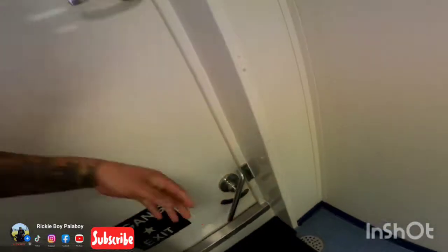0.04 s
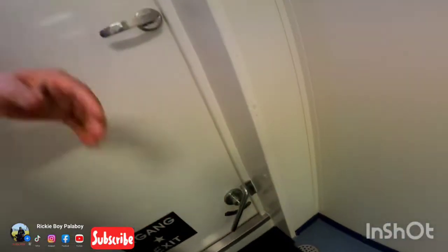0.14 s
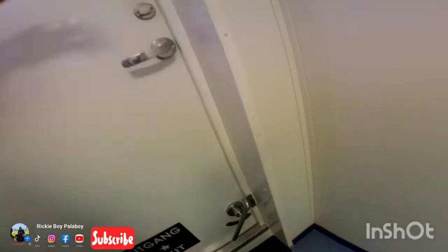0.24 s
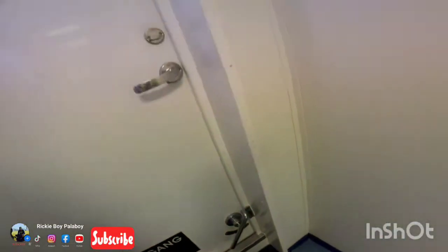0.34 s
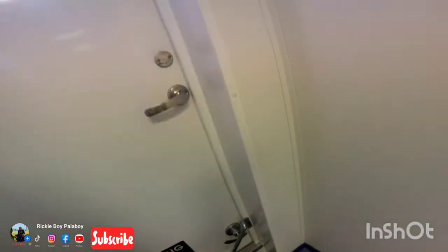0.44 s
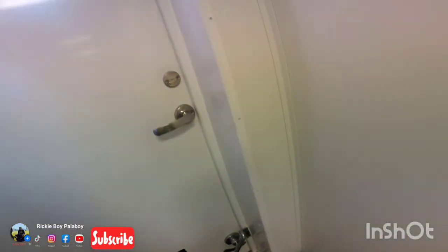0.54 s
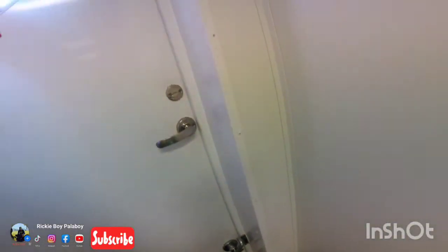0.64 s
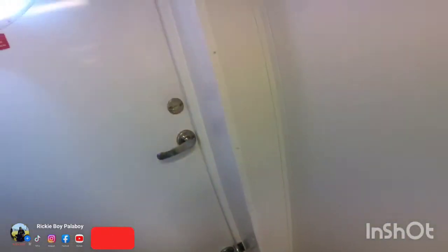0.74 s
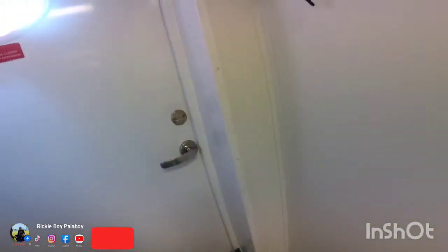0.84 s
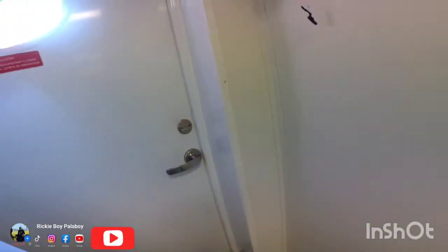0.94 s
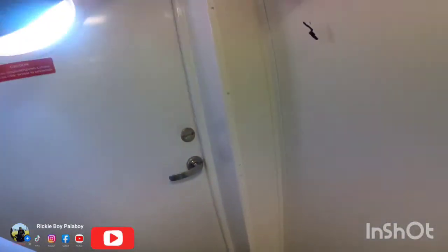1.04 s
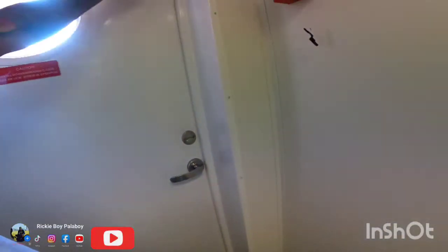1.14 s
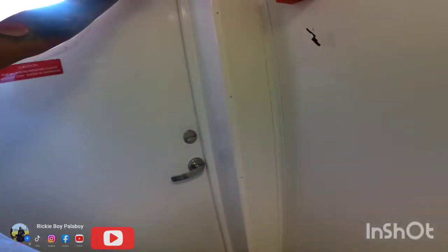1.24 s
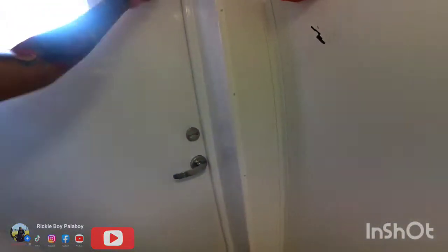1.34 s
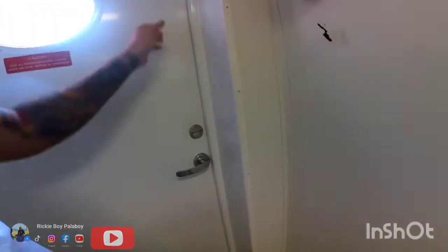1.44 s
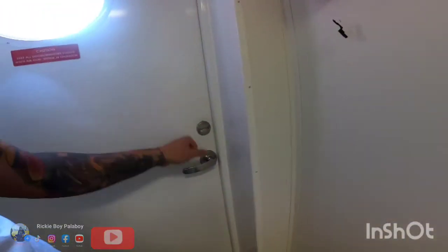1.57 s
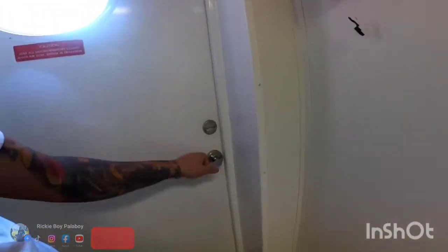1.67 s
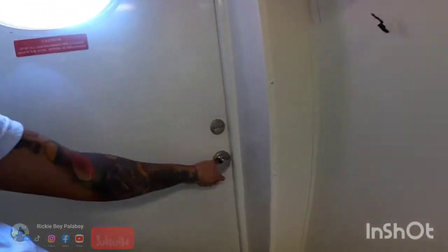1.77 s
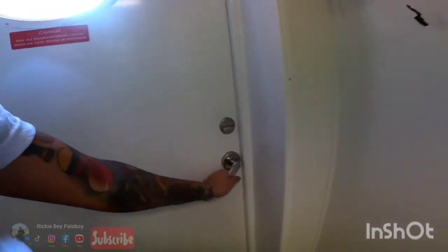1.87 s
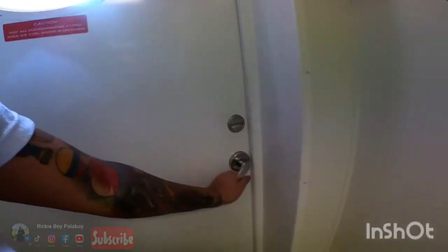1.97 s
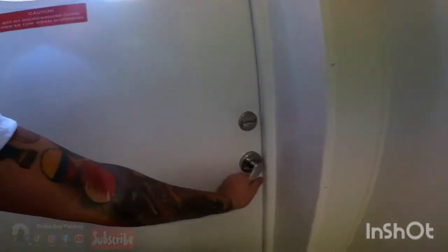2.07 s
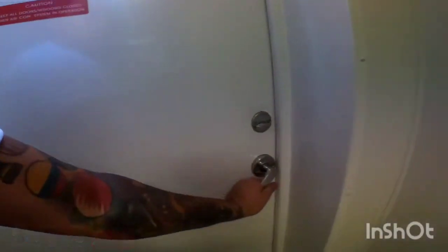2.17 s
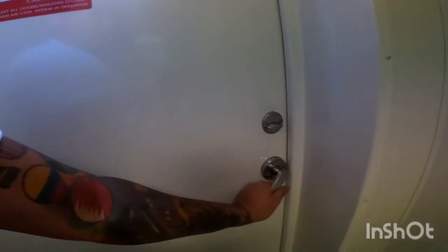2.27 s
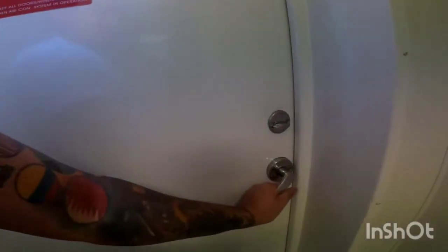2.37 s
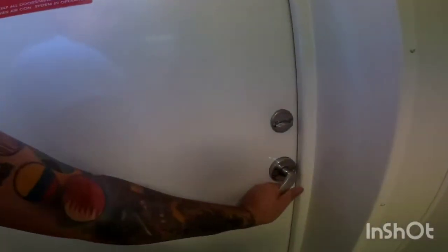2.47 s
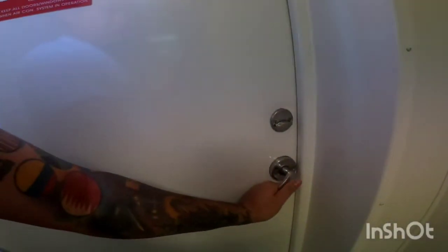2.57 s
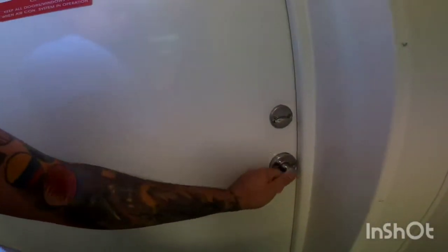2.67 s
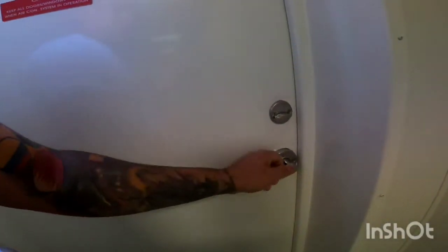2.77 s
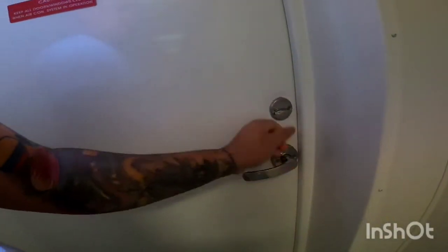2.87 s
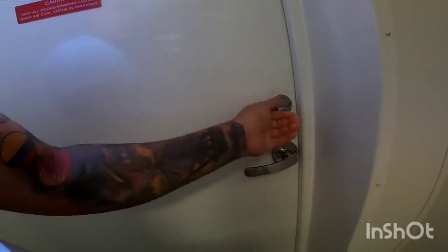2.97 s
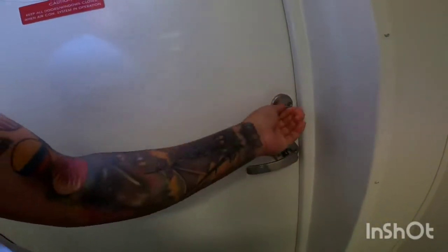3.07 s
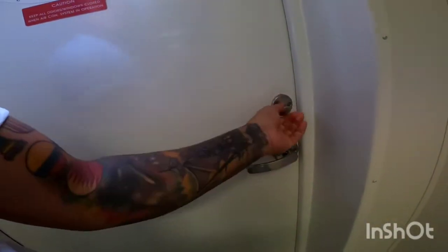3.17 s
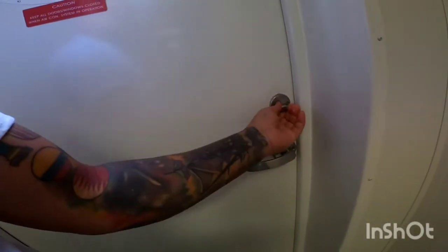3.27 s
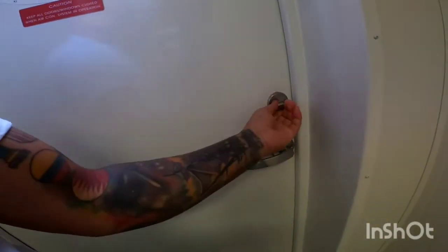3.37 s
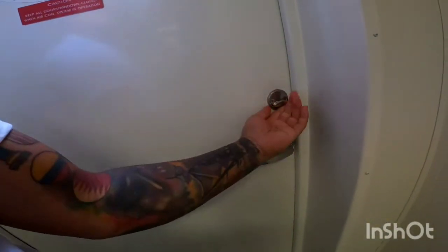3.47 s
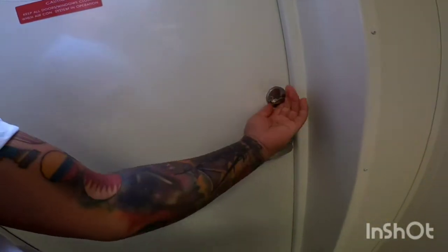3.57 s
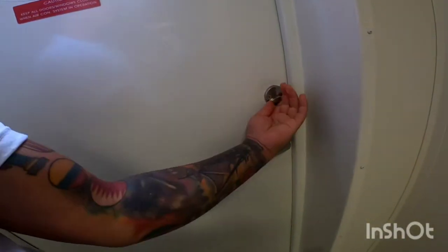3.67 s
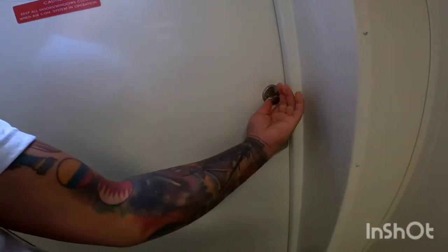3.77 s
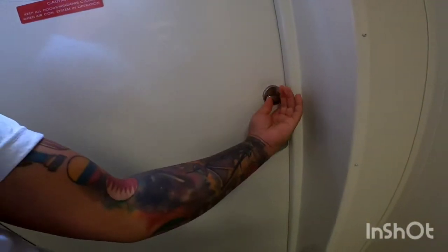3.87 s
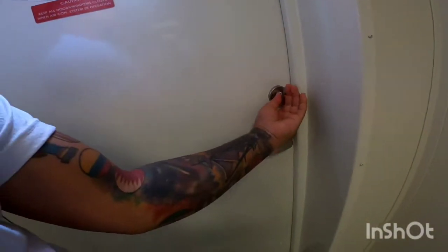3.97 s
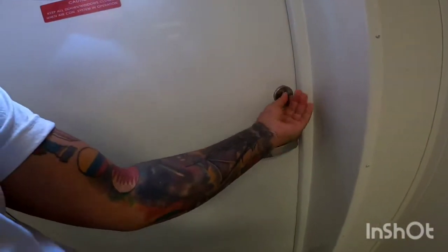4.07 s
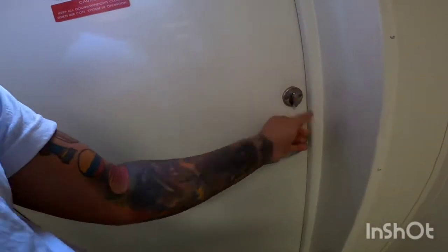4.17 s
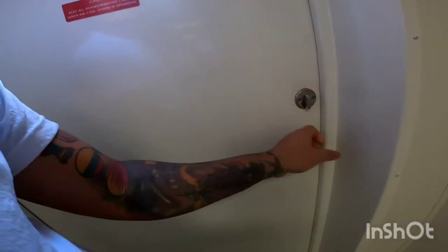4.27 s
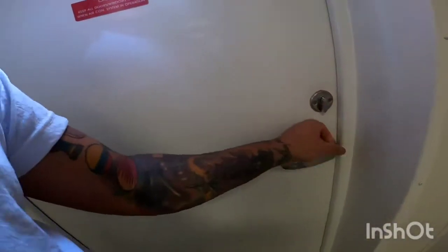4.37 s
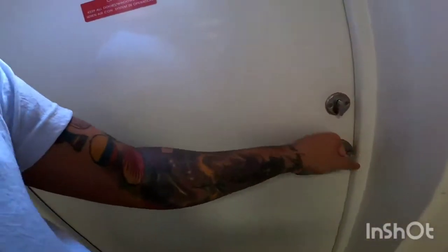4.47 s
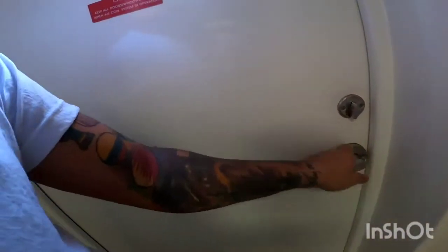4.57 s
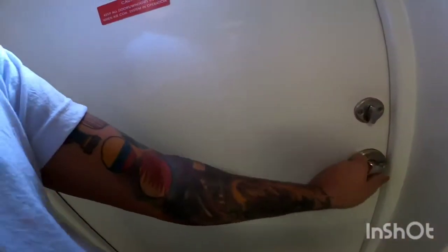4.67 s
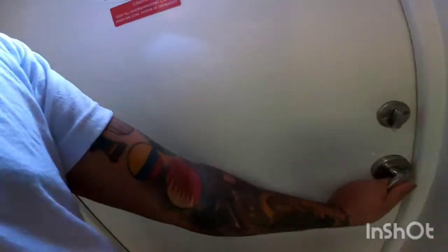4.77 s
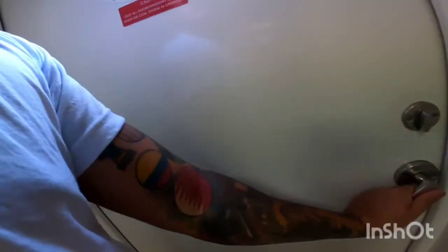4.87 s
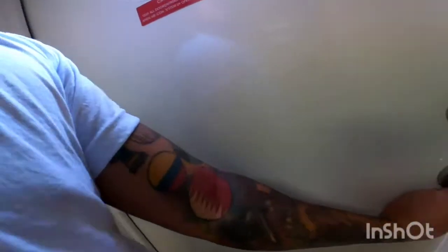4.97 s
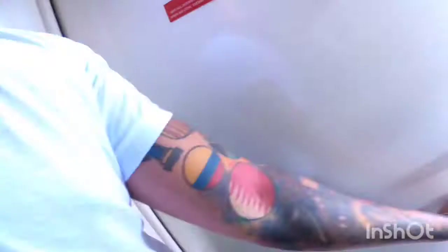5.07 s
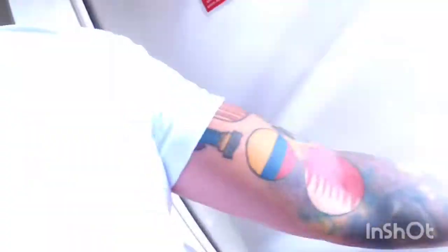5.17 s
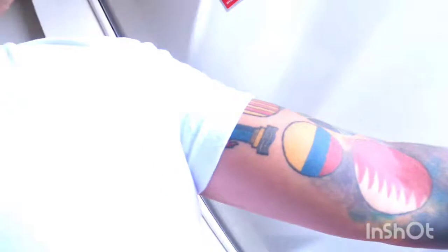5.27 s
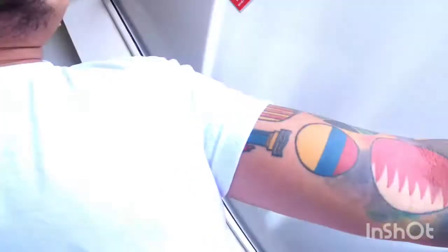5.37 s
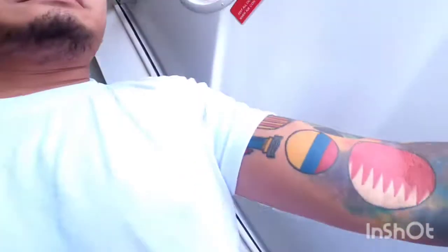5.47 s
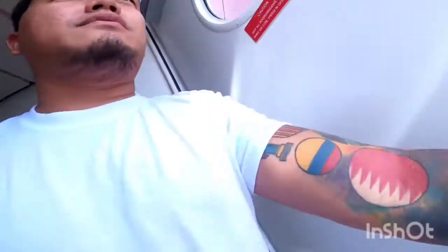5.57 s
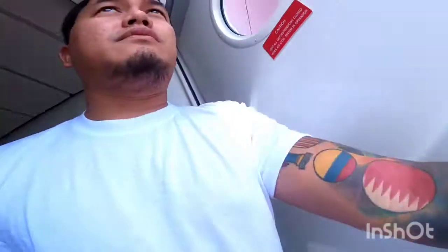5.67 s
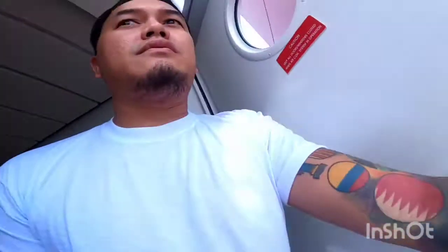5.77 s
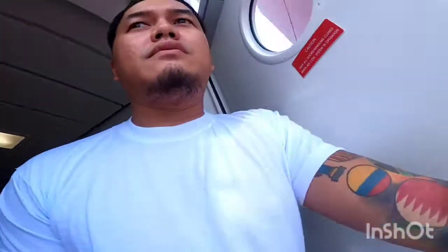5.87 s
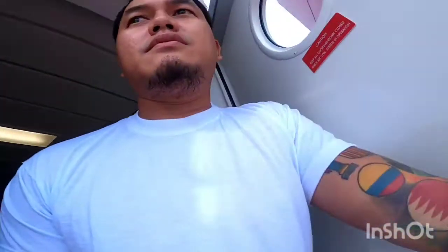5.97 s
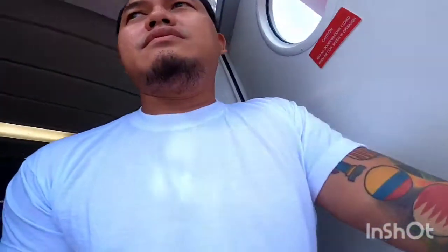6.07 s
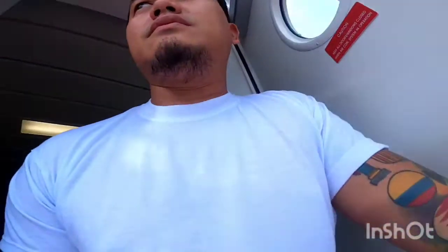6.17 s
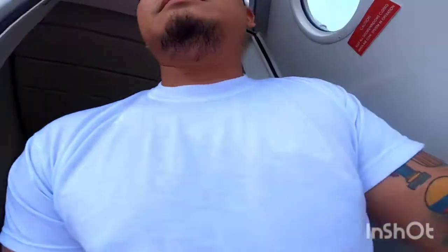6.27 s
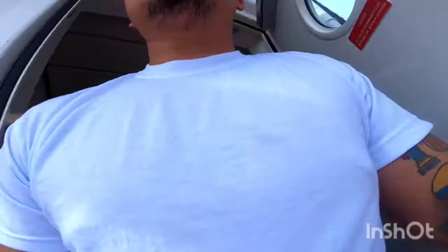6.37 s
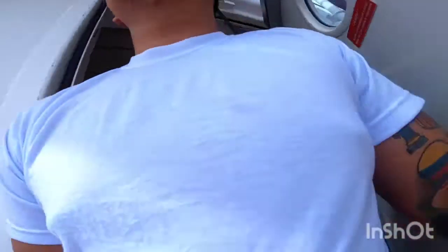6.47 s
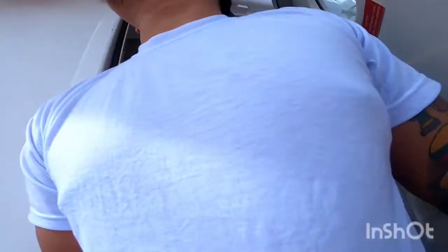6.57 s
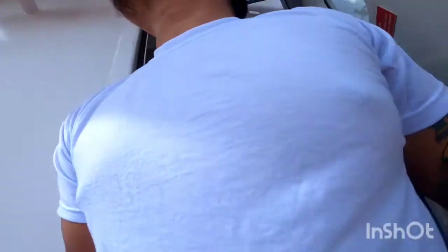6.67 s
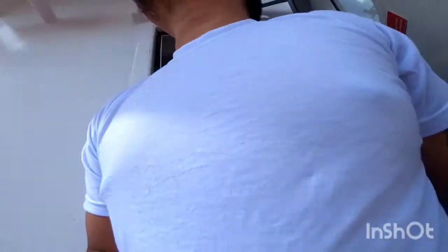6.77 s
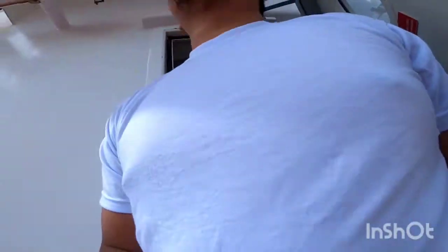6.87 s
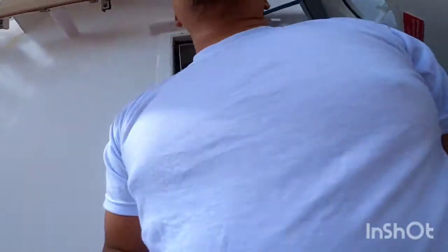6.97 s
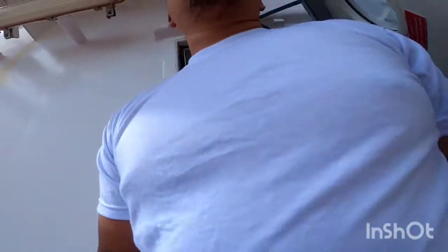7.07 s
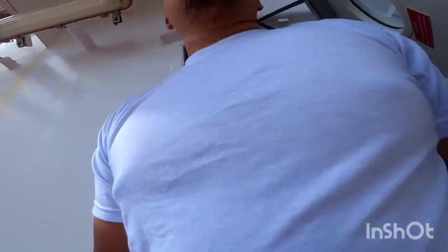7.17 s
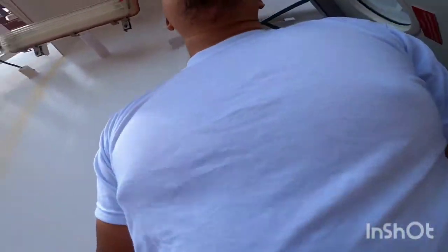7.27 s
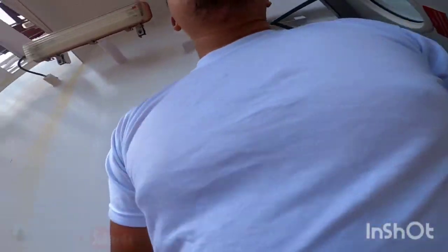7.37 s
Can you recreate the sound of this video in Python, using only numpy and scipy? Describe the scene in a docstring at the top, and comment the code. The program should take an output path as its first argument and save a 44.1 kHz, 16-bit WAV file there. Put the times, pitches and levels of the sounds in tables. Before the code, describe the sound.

Deep uneven hull throb and soft vent air; heavy steel door latches clack and echo, then the door opens onto a loud fan roar.

```python
"""First the deep throb of a hull and soft vent air, heard in a small steel ship's lobby; then tiny metal pings.
Close to the microphone a hand works the dogs, handle and lock of a weather door: noise cracks leave steel modes ringing.
The bolt snaps back, the leaf drags out of its seal and the panel booms in bending modes; bare walls echo the hardware.
Shirt rustle is faint indoors and returns on deck, where the filtered-noise roar and fluttering tones of the fans
stand amid wind."""
import sys
import numpy as np
from scipy import signal
from scipy.fft import rfft, irfft
from scipy.io import wavfile

SR = 44100
rng = np.random.default_rng(int(sys.argv[2]) if len(sys.argv) > 2 else 0)


def put_to_file(sound):
    """Save the sound as 16-bit audio at rate SR, in the file named by the first command-line argument."""
    columns = np.atleast_2d(sound).T  # one column per channel
    safe = np.clip(columns, -1, 1)
    whole_steps = np.round(safe * 32767)
    wavfile.write(sys.argv[1], SR, whole_steps.astype(np.int16))


N = 328104
TIME, BINS = np.arange(N) / SR, np.fft.rfftfreq(N, 1 / SR)


def amp(db):
    """Decibels to gain."""
    return 10 ** (np.asarray(db) / 20)


def unit(x):
    """Scales to rms 1."""
    return x / np.sqrt(np.mean(abs(x) ** 2) + 1e-30)


def over_hz(table, hz, axis=1):
    """Reads a column of a table along log frequency."""
    columns = np.transpose(table)
    return np.interp(np.log(hz + 1), np.log(columns[0] + 1), columns[axis])


def over_time(table, axis=1):
    """Reads a column of a table at every sample."""
    columns = np.transpose(table)
    return np.interp(TIME, columns[0], columns[axis])


def add(mix, s, sound):
    """Mixes a sound in at time s."""
    part = mix[:, round(s * SR):][:, :sound.shape[-1]]
    part += sound[..., :part.shape[1]]


def wander(rate_hz):
    """Slow complex random motion of rms 1."""
    spin = np.fft.fftfreq(N, 1 / SR)
    noise = rng.standard_normal(N) + 1j * rng.standard_normal(N)
    return unit(np.fft.ifft(noise * np.exp(-(spin / rate_hz) ** 2)))


def humps(table, hz):
    """Gain in dB of a set of broad resonances and dips."""
    return sum(db / (1 + (2 * (hz - f) / width) ** 4) for f, width, db in table)


def resonance(x, hz, width):
    """A resonance of gain 1 that follows a fixed or moving frequency."""
    turn = np.exp(2j * np.pi * np.cumsum(hz * np.ones(x.shape[-1])) / SR)
    r = np.exp(-np.pi * width / SR)
    # shift the resonance down to 0 Hz, smooth there, and shift back up
    return 2 * (turn * signal.lfilter([1 - r], [1, -r], x / turn)).real


def registers(x, edges_hz):
    """Splits a sound into bands at the given edges."""
    passes = [(edges_hz[0], "low")]
    passes += [(pair, "band") for pair in zip(edges_hz, edges_hz[1:])]
    passes += [(edges_hz[-1], "high")]
    return [signal.sosfilt(signal.butter(5, hz, kind, fs=SR, output="sos"), x) for hz, kind in passes]


def ringing(modes, t):
    """The dying modes of a struck part."""
    return sum(amp(db - 60 * t / t60) * np.sin(2 * np.pi * (hz * t + rng.random())) for hz, db, t60 in modes)


def rattling(modes, t, blur_hz):
    """The dying modes of a loose part, each blurred by its chatter."""
    chatter = rng.standard_normal((2, len(t)))
    out = 0
    for hz, db, t60 in modes:
        blurred = resonance(resonance(chatter, hz, blur_hz), hz, blur_hz)
        out = out + amp(db - 60 * t / t60) * unit(blurred)
    return out


# likeness of the two microphone ports: (frequency [Hz], coherence [0-1])
PORT_LIKENESS = [(40, 1), (90, 1), (180, 1), (320, 0.99), (520, 0.95), (900, 0.82), (1500, 0.8),
                 (2600, 0.51), (4500, 0.25), (8000, 0.18)]
# lead of the left port: (frequency [Hz], phase [radians])
PORT_LEAD = [(280, 0), (1000, -0.13), (1900, 0.087), (4000, -0.91), (8000, -1.7)]


def air_noise(colour, size=N):
    """Coloured noise at the two ports: alike in the bass, apart in the treble."""
    hz = np.fft.rfftfreq(size, 1 / SR)
    left, other = rfft(rng.standard_normal((2, size)))
    same = np.clip(over_hz(PORT_LIKENESS, hz), 0, 1)
    right = same * left + np.sqrt(1 - same ** 2) * other
    right = right * np.exp(-1j * over_hz(PORT_LEAD, hz))
    return unit(irfft(np.array([left, right]) * amp(colour(hz)), size))


# uneven level of the hull's beating tone: (time [s], level before trim [dB])
THROB = [(0, -33.5), (.08, -22.5), (.17, -36), (0.45, -30.5), (.75, -25.5), (.85, -30), (0.95, -23),
         (1.27, -29.5), (1.38, -40), (1.73, -22.5), (2.18, -23), (2.45, -46), (3.0, -31), (3.12, -41),
         (3.32, -21.5), (3.41, -35), (3.5, -29), (3.84, -34.5), (4.03, -25), (4.16, -22.5), (4.21, -39),
         (4.3, -27), (4.43, -21), (4.55, -49), (4.68, -23.5), (4.8, -29), (5.0, -27.5), (5.6, -27.5),
         (6.3, -33.5), (7.4, -43.5)]
THROB_HZ, THROB_TRIM_DB = 43.8, -2.5
SHUDDER_DB, SHUDDER_HZ = -39, 11.2  # random shaking that beats with the tone


def hull(overtone_db=-20):
    """The engine shakes the hull in one deep tone with a weak octave; random shuddering makes it beat."""
    pitch_hz = THROB_HZ + .35 * wander(2.14).real  # slight drift
    turn = np.exp(2j * np.pi * np.cumsum(pitch_hz) / SR)
    tone = amp(over_time(THROB) + THROB_TRIM_DB) * (turn + amp(overtone_db) * turn ** 2)
    shudder = amp(SHUDDER_DB) * wander(SHUDDER_HZ) * turn
    return np.sqrt(2) * (tone + shudder).real


# colour of the lobby's vent air: (frequency [Hz], density [dB per Hz])
VENT_COLOUR = [(20, -4), (85, -2), (120, -13.5), (160, -11.5), (225, -16), (300, -17.5), (450, -20.5),
               (650, -27.5), (1600, -34.5), (2400, -46.5), (3500, -53), (5000, -60.5), (7500, -62),
               (10000, -75), (15000, -87.5)]
VENT_DB = -37.5


def vent():
    """Soft, dull, nearly steady air of the lobby's ventilation."""
    swell_db = .6 * wander(3).real
    return amp(VENT_DB + swell_db) * air_noise(lambda hz: over_hz(VENT_COLOUR, hz))


# where the microphone is: (time [s], place [0 lobby, 1 doorway, 2 deck])
PLACE = [(4.8, 0), (4.98, .5), (5.16, 1), (5.6, 1.1), (6.1, 1.8), (6.7, 2)]
# gusts on the microphone: (lobby [dB], doorway [dB], deck [dB])
WIND_DB = (-80, -58, -36.5)


def wind(corner_hz=55, lump_db=3):
    """Eddies buffet each port on its own, more the farther out the microphone is."""
    band = signal.butter(2, [corner_hz / 3, corner_hz * 2], "band", fs=SR, output="sos")
    eddies = signal.sosfilt(band, rng.standard_normal((2, N)))
    level_db = np.interp(over_time(PLACE), np.arange(3), WIND_DB)
    return unit(eddies) * amp(level_db + lump_db * wander(6).real)


# blade tones of the fans: (frequency [Hz], lobby [dB], doorway [dB], deck [dB], flutter outside [0-1])
FAN_TONES = [(71.2, -52.5, -38, -45, .45), (149.5, -51, -39.5, -38.5, .55),
             (197.1, -52.5, -28.5, -26.8, .22), (394.2, -58, -30.5, -41, .17), (458, -65.5, -41, -36, .55),
             (591.3, -66, -51, -45.5, .25), (788.4, -78, -42, -56, .15), (898, -80, -52, -51, .4)]


def fan_tones(flutter_hz=6):
    """Blade tones hold their pitch, flutter in the turbulent inflow, and arrive fainter and more blurred indoors."""
    place, out = over_time(PLACE), np.zeros(N)
    lobby_flutter = .17  # added indoors
    for hz, *levels_db, outside_flutter in FAN_TONES:
        flutter = outside_flutter + lobby_flutter * np.maximum(1 - place, 0)
        strength = (1 - flutter + flutter * wander(flutter_hz)) / np.hypot(1 - flutter, flutter)
        tone = (strength * np.exp(2j * np.pi * hz * TIME)).real
        out += amp(np.interp(place, np.arange(3), levels_db)) * tone
    return np.sqrt(2) * out


def passing(start, end, blur_s=0.027):
    """Rises from 0 to 1 and falls back while the microphone passes a spot."""
    return (np.tanh((TIME - start) / blur_s) - np.tanh((TIME - end) / blur_s)) / 2


# colour of the deck fans: (frequency [Hz], density [dB per Hz])
ROAR_COLOUR = [(20, -11), (70, 3), (110, 1), (280, 2.5), (460, 0), (580, -9.5), (900, -12), (1200, -16),
               (2700, -27), (4500, -39.5), (6000, -50.5), (7800, -53), (9500, -65), (15000, -77)]
# resonances and dips of the fan ducts: (frequency [Hz], width [Hz], lift [dB])
DUCT = [(76, 66, -3), (143, 27, 2), (169, 16, -4), (216.6, 25, -4.5), (282, 53, 1.5), (316, 30, 3),
        (362, 64, -3.5), (437, 58, 4.5), (493.6, 24, 6), (523, 45, -5), (970, 83, 1.5)]
# rumble, rush, bright edge and hiss of the fans:
# (deck level [dB], swell as the door opens [s], extra in the frame [dB], extra beside the leaf [dB])
ROAR_BANDS = [(-24.5, 0.38, -1, -1.6), (-33, 0.34, -0.5, -2.5), (-41.5, 0.28, -.5, 1),
              (-41, 0.21, -3.5, -1.15)]
# the microphone passes frame, then leaf: (from [s], to [s])
IN_FRAME, BESIDE_LEAF = (4.6, 5.48), (5.65, 6.47)
OPENS_S, SWELL_POWER = 4.823, 1.38  # the seal parts; short waves get through the gap first


def deck_roar(gust_db=1.05):
    """Turbulent fan air; each register swells as the door opens, and frame and leaf colour it in passing."""
    def colour(hz):
        return over_hz(ROAR_COLOUR, hz) + humps(DUCT, hz)
    out = np.zeros((2, N))
    for k, (deck_db, swell_s, frame_db, leaf_db) in enumerate(ROAR_BANDS):
        band = registers(air_noise(colour), (520, 1050, 1800))[k]
        gap = np.clip((TIME - OPENS_S) / swell_s, 0, 1) ** SWELL_POWER
        level_db = deck_db + frame_db * passing(*IN_FRAME) + leaf_db * passing(*BESIDE_LEAF)
        out += unit(band) * gap * amp(level_db + gust_db * wander(11.0).real)
    return out


# air gaps that ring as the microphone passes:
# (from [s], to [s], first frequency [Hz], last frequency [Hz], width [Hz], lift [dB])
NOOKS = [(5.1, 5.5, 735, 820, 260, 6.5), (5.1, 5.5, 405, 420, 110, 2), (5.55, 6.3, 1220, 1260, 260, 4),
         (6.0, 6.7, 1210, 1530, 324, 4.5), (6.4, 7.313, 590, 550, 129, 4)]


def walk_through(x):
    """Gaps between leaf, body and bulkhead ring in passing; each resonance swells, glides and fades."""
    for start, end, from_hz, to_hz, width, db in NOOKS:
        along = np.clip((TIME - start) / (end - start), 0, 1)
        lift = amp(db * np.sin(np.pi * along)) - 1
        x = x + lift * resonance(x, from_hz + (to_hz - from_hz) * along, width)
    return x


# shading of the right port by the body on deck: (frequency [Hz], left-right difference [dB])
BODY_SHADE = [(100, 0), (300, 1.6), (700, 5), (1800, 6), (8000, 4)]


def turn_on_deck(x, start=5.36, end=6.7, levelling=0.36):
    """Turning outside shades the right port and undoes part of the phase lead between the ports."""
    lean_db = over_hz(BODY_SHADE, BINS) / 2
    left = amp(lean_db)
    right = amp(-lean_db) * np.exp(1j * levelling * over_hz(PORT_LEAD, BINS))
    turned = irfft(rfft(x) * np.array([left, right]), N)
    return x + np.interp(TIME, [start, end], [.15, 1]) * (turned - x)


# colour of sliding cloth: (frequency [Hz], density [dB per Hz])
CLOTH = [(300, -2.5), (800, -1.5), (1500, 0), (2500, -0.5), (3300, 0.5), (4200, 3.5), (6000, -7),
         (7600, -5), (9500, -17), (11300, -16), (12500, -17.5), (15500, -29.5)]
# moves of arm or body: (time of fastest motion [s], level [dB], rise [s], fall [s])
MOVES = [(.65, -65, 0.58, 0.12), (1.1, -57, 0.23, 0.2), (1.63, -66, 0.066, 0.2), (2.1, -66.5, 0.27, 0.49),
         (5.93, -50.5, 0.025, 0.074), (6.05, -59, 0.21, 0.37), (7.2, -63, 0.94, 0.36)]


def shirt(grain_db=0.5):
    """Fibres catch and slip in a fine, uneven hiss that swells and fades with each move."""
    speed = sum(amp(db) * np.exp(-((TIME - s) / np.where(TIME < s, rise, fall)) ** 2) for s, db, rise, fall in MOVES)
    return speed * amp(grain_db * wander(60).real) * air_noise(lambda hz: over_hz(CLOTH, hz))


# the leaf rocks in its seal, or rings in the bending mode that a blow favours:
# (time [s], frequency [Hz], starting level [dB], t60 [s])
ROCKS = [(1.067, 22, -20.5, 0.57), (1.06, 592, -41, .5), (1.06, 495, -43, .38), (2.12, 20.8, -15, 1),
         (2.131, 160, -32.5, .28), (4.88, 208, -34, .35)]


def door_rock():
    """The freed leaf sways in slow, dying cycles, or hums briefly as it flexes."""
    t, out = np.arange(SR) / SR, np.zeros((2, N))
    for s, hz, db, t60 in ROCKS:
        add(out, s, amp(db - 60 * t / t60) * np.sin(2 * np.pi * hz * t))
    return out


# crowded low modes of the panel: (frequency [Hz], density [dB per Hz])
PANEL = [(60, -11), (155, 1.5), (210, -16.5), (285, -12), (370, -2), (520, -1), (630, -2), (820, -19),
         (1250, -22.5), (1900, -28), (2900, -18.5), (5000, -50.5)]
# parts that come free and set the panel booming:
# (time [s], level before decay [dB], t60 [s], favoured frequency [Hz], its lift [dB])
BOOMS = [(1.06, -36, 0.5, 300, 5), (2.127, -44, 0.22, 250, 4), (4.056, -39, 0.85, 450, 2.5),
         (4.872, -44, 0.28, 660, 7)]


def panel_boom(build=0.0049, spot_q=3):
    """Bending waves spread over the leaf and die in its low modes; each striking spot favours some of them."""
    t, out = np.arange(SR) / SR, np.zeros((2, N))
    for s, db, t60, spot_hz, spot_db in BOOMS:
        modes = air_noise(lambda hz: over_hz(PANEL, hz), size=SR)
        modes = modes + (amp(spot_db) - 1) * resonance(modes, spot_hz, spot_hz / spot_q)
        add(out, s, modes * amp(db - 60 * t / t60) * (1 - np.exp(-t / build)))
    return out


# the leaf leaves its seal: (from [s], to [s], level at the middle [dB])
SEAL_RUB = (4.93, 5.17, -56.5)


def seal_rub(slips_per_s=900, uneven_db=4, rub_hz=2400, width_hz=1500):
    """The leaf drags out of its rubber seal in a short, grainy scrape of random slips."""
    start, end, db = SEAL_RUB
    sizes = amp(uneven_db * rng.standard_normal(N)) * rng.standard_normal((2, N))
    slips = (rng.random(N) < slips_per_s / SR) * sizes
    scrape = unit(resonance(resonance(slips, rub_hz, width_hz), rub_hz, width_hz))
    return scrape * amp(db) * np.sin(np.pi * np.clip((TIME - start) / (end - start), 0, 1))


# colour of struck latch steel: (frequency [Hz], density [dB per Hz])
LATCH_COLOUR = [(100, -4.5), (160, 4), (230, 0.5), (330, -6.5), (600, -8.5), (850, -11), (1500, -4),
                (2500, -16.5), (3300, -19.5), (4300, -21), (6000, -30), (8000, -39.5), (10000, -47.5),
                (15000, -52.5)]
# the handle's spindle grinds as it turns: (from [s], to [s], level at the middle [dB])
GRINDS = [(1.816, 1.998, -50), (2.052, 2.16, -48), (3.26, 3.673, -58.5), (4.018, 4.09, -43),
          (4.614, 5.097, -55.5)]


def spindle(slips_per_s=300, uneven_db=3, slip_t60=0.014, dull_hz=3600):
    """Tiny stick-slips of the spindle sound in the colour of the latch steel, with the treble rolled off."""
    size = 1024
    slip = air_noise(lambda hz: over_hz(LATCH_COLOUR, hz), size=size)
    slip = slip * amp(-60 * np.arange(size) / SR / slip_t60)
    slip = signal.lfilter(*signal.butter(2, dull_hz, fs=SR), slip)
    sizes = amp(uneven_db * rng.standard_normal(N)) * rng.choice([-1, 1], N)
    train = (rng.random(N) < slips_per_s / SR) * sizes
    grind = unit(signal.oaconvolve(train[None], slip, axes=1)[:, :N])
    turning = sum(amp(db) * np.sin(np.pi * np.clip((TIME - start) / (end - start), 0, 1)) for start, end, db in GRINDS)
    return grind * turning


# the lock's steel parts ring: (time [s], centre frequency [Hz], starting level [dB], t60 [s])
PINGS = [(0.172, 3400, -59, .04), (0.331, 6330, -50, 0.05), (0.33, 6950, -55, .04),
         (2.776, 5200, -55, 0.05), (5.013, 7400, -58, .04)]


def pings(spread=0.046, count=12):
    """Springs and pins ring in clusters of close high modes."""
    t, out = np.arange(SR // 2) / SR, np.zeros((2, N))
    for s, hz, db, t60 in PINGS:
        modes_hz = hz * (1 + spread * rng.uniform(-1.1, 1, count))
        cluster = sum(np.sin(2 * np.pi * (f * t + rng.random((2, 1)))) for f in modes_hz)
        add(out, s, unit(cluster) * amp(db - 60 * t / t60) * np.minimum(t / .001, 1))
    return out


# the thumb turn plucks its spring: (time [s], level [dB])
TWANGS = [(3.053, -69), (3.866, -71)]
# modes of that spring: (frequency [Hz], relative level [dB], t60 [s])
SPRING = [(6368, -8, .13), (6780, -4, .22), (7400, -9, .12), (7810, 0, .3), (8161, -8, .1),
          (8700, -10, .25)]


def spring(blur_hz=70):
    """The thumb turn's spring buzzes on in a few fine, high lines."""
    t, out = np.arange(SR // 2) / SR, np.zeros((2, N))
    for s, db in TWANGS:
        add(out, s, amp(db) * rattling(SPRING, t, blur_hz))
    return out


# the bolt snaps back against its stop: (time [s], level [dB])
BOLT_STOP = (4.052, -52)
# modes of the bolt: (frequency [Hz], relative level [dB], t60 [s])
BOLT = [(2150, 1, 0.54), (2260, 2, 0.45), (3280, 2, .42), (3780, 6, .55), (4081, 2, .6), (4320, 3.5, .72),
        (4240, 0, .7), (4580, 2, 0.56), (5609, -5.5, .45), (6010, -13, .5), (6950, -11, .6)]


def bolt(blur_hz=110):
    """The bolt hits its stop and rattles on in a crowd of close modes."""
    t, out = np.arange(SR) / SR, np.zeros((2, N))
    s, db = BOLT_STOP
    add(out, s, amp(db) * rattling(BOLT, t, blur_hz))
    return out


# blows of latch parts: (time [s], clack before trim [dB], thud of the leaf [dB], loss per higher register [dB],
# left-right in the top register [dB], t60 of the crack [s], resonance of the struck part [Hz], its lift [dB])
LATCH_BLOWS = [(1.0571, -41, -38, 12, 7, 0.045, 3400, 8.5), (1.0619, -44.5, -42, 12, 7, 0.069, 1630, 7),
               (1.847, -60, -43, 2, 3, 0.037, 4000, 1), (1.857, -49.5, -42, 5, -1, 0.033, 3540, 3),
               (1.862, -44, -41, 15, 3, 0.026, 1450, 4.5), (1.866, -46, -43, 17, 1, .09, 1540, 5.5),
               (1.883, -56, -44, 14, 2, .03, 3000, 1), (2.016, -53, -37.5, 17, -3, .055, 1800, 4),
               (2.073, -65, -48, 5, 3, 0.033, 3500, 6), (2.087, -57.5, -44, 7, 5, 0.054, 3500, 9),
               (2.1, -60, -48, 3, -1, .04, 4500, 5), (2.114, -44.5, -36.5, 7.5, 0, 0.018, 3290, 5),
               (2.118, -50, -46, 10, 2, 0.03, 1100, 9), (2.1302, -46.5, -42, 7, 1, 0.034, 3820, 6.5),
               (2.1361, -47, -38, 8, 3, 0.02, 7600, 12), (2.142, -53, -38.5, 10, 4, 0.026, 965, 7),
               (2.153, -53, -50, 10, 3, 0.035, 1800, -2), (2.1837, -48.5, -40, 7.5, 3, .03, 900, 8),
               (2.777, -58.5, -45.5, 3.5, -3, 0.024, 5200, 4), (2.839, -51, -46, 12.5, 4, 0.058, 1020, 10),
               (3.0525, -55, -55, 9, -2, 0.025, 6850, 3.5), (3.265, -46.5, -55, 15.5, -3, 0.07, 1710, 6.5),
               (3.307, -53.5, -47.5, 12, 1, 0.09, 5830, 8.5), (3.379, -55.5, -41, 12.5, -3, 0.067, 1500, 0),
               (3.863, -54, -45, 14.5, -2, 0.13, 8100, 12.5), (3.992, -42, -42, 8.5, -2, 0.095, 2830, 4),
               (4.045, -42, -52, 3, -3, 0.081, 6000, 2), (4.05, -28.5, -38.5, 5, -4.5, 0.039, 3380, -12),
               (4.06, -27, -46, 9, 12, 0.053, 3380, -4), (4.482, -64, -40, 14, 2.5, 0.044, 450, -3),
               (4.557, -64, -41, 7, 1, 0.031, 4500, 2), (4.752, -61.5, -44.5, 24, 6, 0.04, 1400, 10),
               (4.809, -57, -41.5, 12, -1, 0.06, 1600, 10.5),
               (4.871, -46.5, -37.5, 20.5, -1, 0.063, 706, 7), (4.94, -48, -39, 11.5, 0, 0.057, 4600, 7.5),
               (5.084, -43.5, -32.5, 12.5, 6, 0.058, 5030, 7)]
# ringing of the door leaf and its lock: (frequency [Hz], relative level [dB], t60 [s])
STEEL = [(170, 8, 0.24), (258.3, -3.5, 1), (293, -8, 0.2), (387.3, 0.5, 0.38), (445.4, 2, 0.52),
         (490, -7.5, 0.19), (599, -15, 0.34), (660, -5, 0.29), (1210, -14, 0.45), (1450, -15, .25),
         (1820, -7, 0.18), (2690, -9.5, 0.18), (2660, -6, 0.15), (3885, -21, .5), (5830, -29, 0.45)]
# short, broad resonances of the lock case: (frequency [Hz], width [Hz], lift [dB])
LOCK_CASE = [(910, 240, -0.5), (1270, 100, 5), (1700, 410, 2), (2140, 240, 0), (2660, 650, 5.5),
             (3960, 320, 3), (5600, 700, -1.5), (12500, 3200, 3)]


def latch(rise=0.0003, ring_db=-26, trims_db=(0, -1, -1, -4), blow_s=0.027, part_q=4):
    """A dense crack coloured by the struck part, with door modes ringing; each blow has its own loss of treble."""
    size = 16384
    t, out = np.arange(size) / SR, np.zeros((2, N))
    for s, clack_db, thud_db, dull_db, pan_db, crack_t60, part_hz, part_db in LATCH_BLOWS:
        parts_db = thud_db, clack_db, clack_db - dull_db, clack_db - 2 * dull_db
        crack = air_noise(lambda hz: over_hz(LATCH_COLOUR, hz) + humps(LOCK_CASE, hz), size=size)
        crack = crack * amp(-60 * t / crack_t60)
        struck = (crack + amp(ring_db) * ringing(STEEL, t)) * (1 - np.exp(-t / rise))
        bands = registers(struck, (800, 3000, 7000))
        blow = np.zeros((2, size))
        for k, (band, db, trim_db) in enumerate(zip(bands, parts_db, trims_db)):
            # the shorter the waves, the more they favour one port
            lean_db = np.array([[pan_db], [-pan_db]]) / 2 * k / (len(bands) - 1)
            # levels count the energy as if spread over blow_s
            blow += unit(band) * np.sqrt(blow_s / t[-1]) * amp(db + trim_db + lean_db)
        part = (amp(part_db) - 1) * resonance(blow, part_hz, part_hz / part_q)
        add(out, s, blow + part)
    return out


# echo of the steel lobby: (frequency [Hz], t60 [s], level [dB])
LOBBY_ECHO = [(150, 0.28, 2.5), (550, 0.79, 0), (900, 1, 0), (1420, 0.73, -7.5), (2400, .65, -8),
              (3200, 0.71, -2), (3900, 0.49, -6.5), (4600, 0.83, -5.5), (5400, 0.78, -6), (7100, 0.65, -5),
              (9000, 0.49, -6), (14500, .36, -8)]


def lobby(x, build=0.0033):
    """Bare steel walls close by: a dense echo that builds within milliseconds and dies band by band."""
    hz, t, z = signal.stft(air_noise(np.zeros_like, size=SR), SR, nperseg=256)
    t60, echo_db = (over_hz(LOBBY_ECHO, hz, axis=k)[:, None] for k in range(1, 3))
    energy_scale = np.sqrt(2 * np.log(1000) / (t60 * SR))  # a longer decay starts lower
    z = z * amp(echo_db - 60 * t / t60) * energy_scale * (1 - np.exp(-t / build))
    tail = signal.istft(z, SR, nperseg=256)[1]
    return signal.fftconvolve(x, tail, axes=1)[:, :N]


PING_ECHO_DB = -5  # the small parts are close by, so less of the lobby is heard on them


def scene():
    """Door hardware in the lobby, the ship's hull and vent air, and the deck outside."""
    small_parts = pings() + spring() + bolt()
    door = latch() + spindle() + seal_rub()
    echo = lobby(door + amp(PING_ECHO_DB) * small_parts)
    inside = door + small_parts + echo + panel_boom() + door_rock() + vent()
    fans = walk_through(deck_roar()) + fan_tones()
    outside = turn_on_deck(fans) + wind()
    return inside + outside + shirt() + hull()


def record(dry):
    """The recorder's band limit: a steep low-pass at 15.7 kHz."""
    low_pass = signal.firwin(511, 15700, window=("kaiser", 9), fs=SR)
    return signal.oaconvolve(dry, low_pass[None], "same")


dry = scene()
out = record(dry)
put_to_file(out)
```